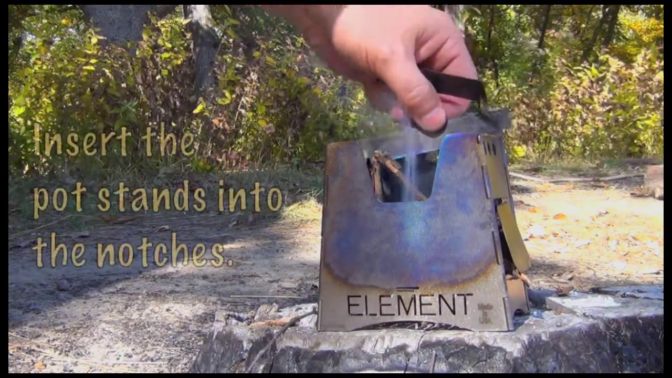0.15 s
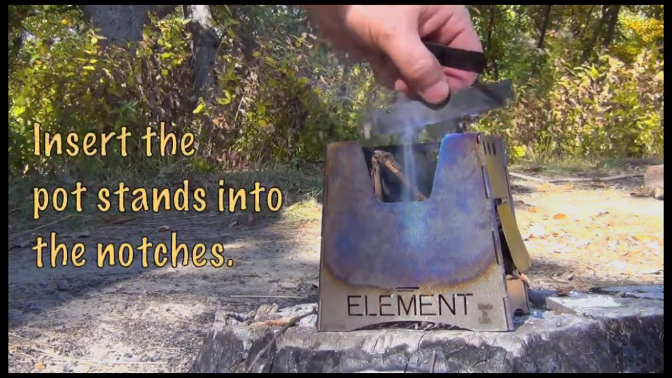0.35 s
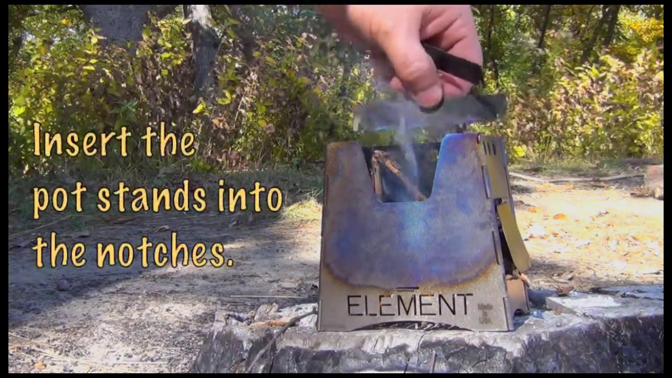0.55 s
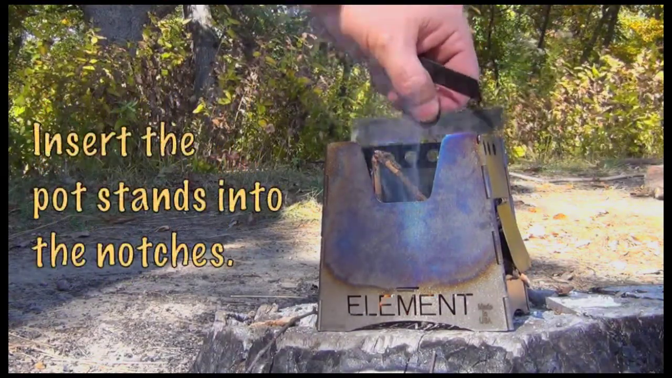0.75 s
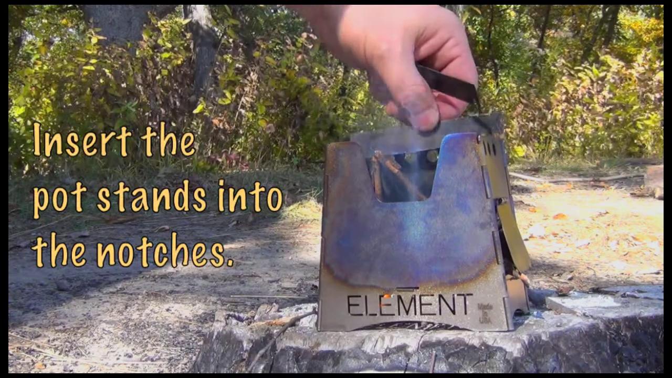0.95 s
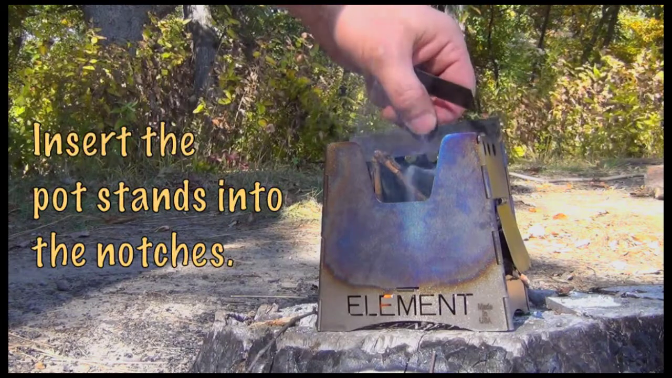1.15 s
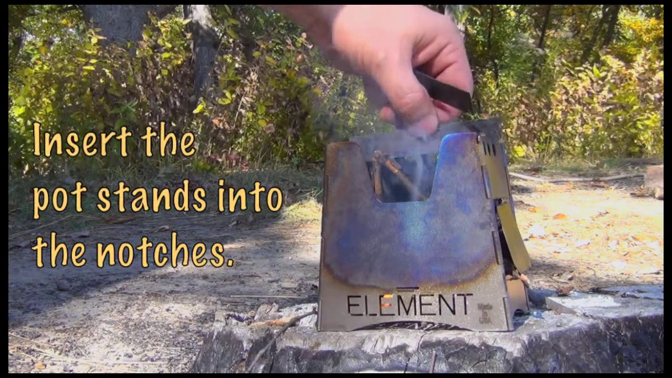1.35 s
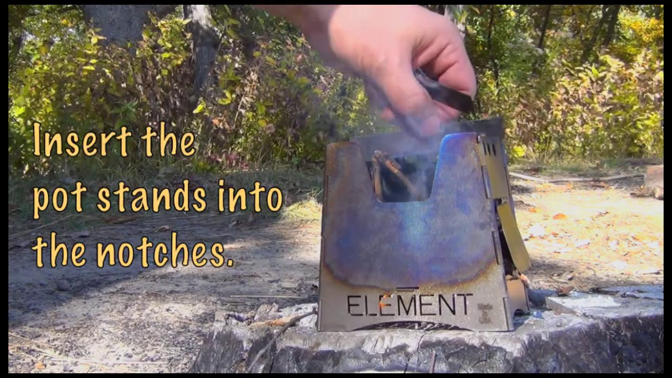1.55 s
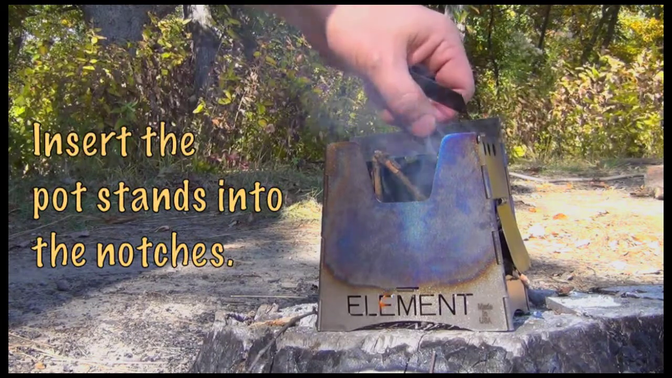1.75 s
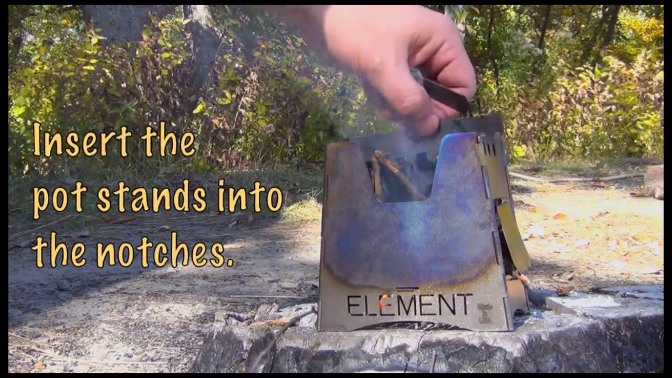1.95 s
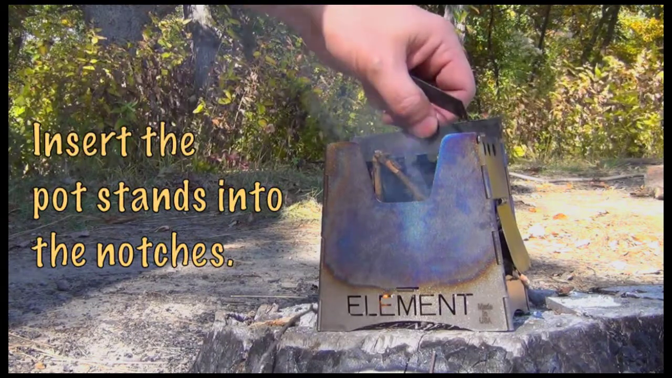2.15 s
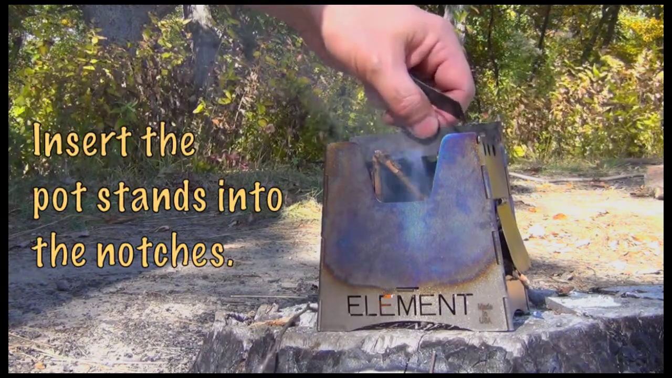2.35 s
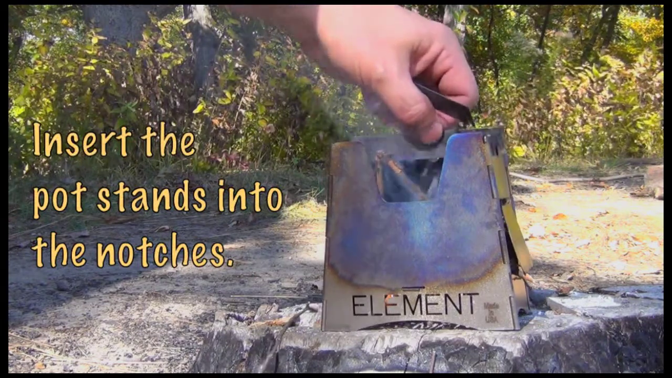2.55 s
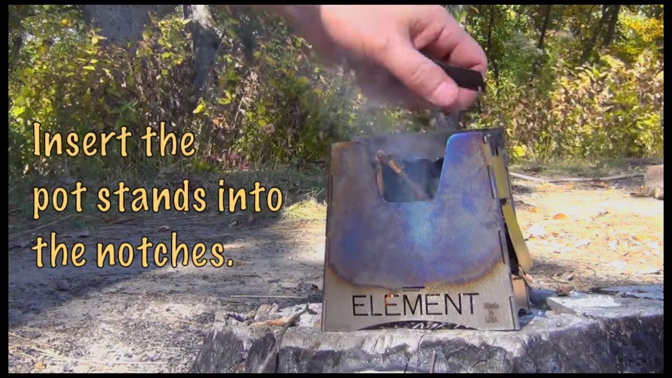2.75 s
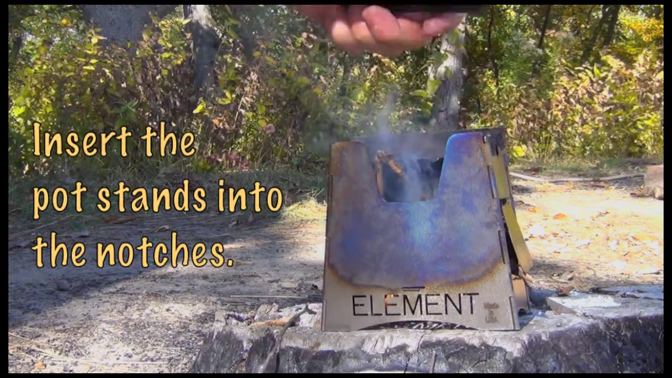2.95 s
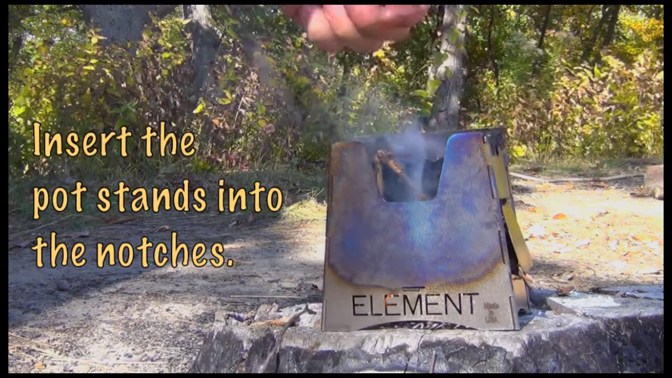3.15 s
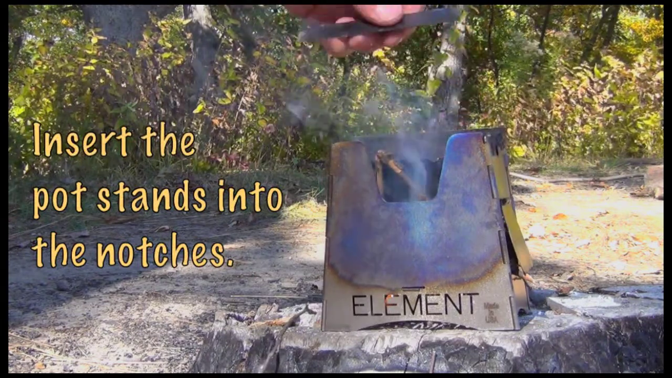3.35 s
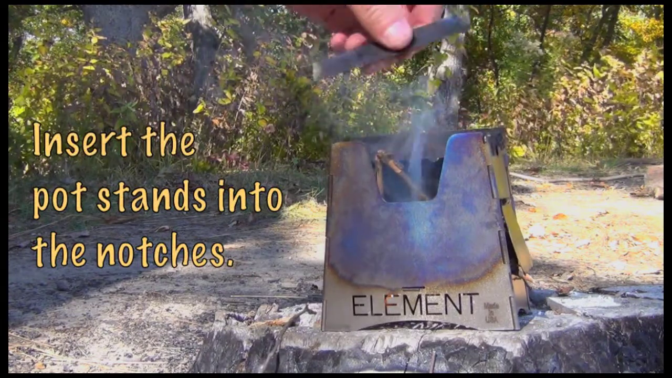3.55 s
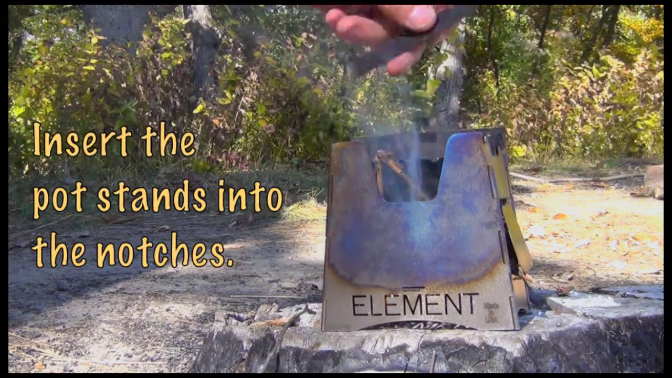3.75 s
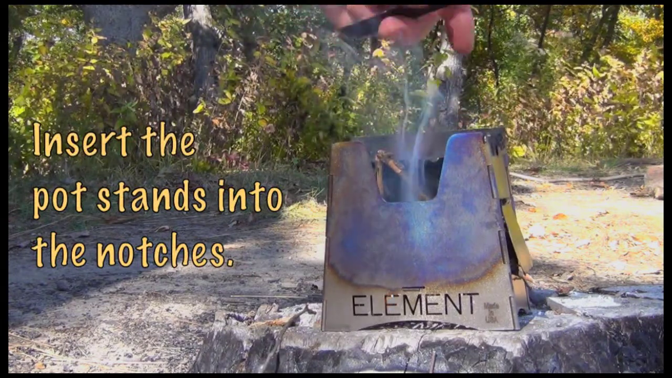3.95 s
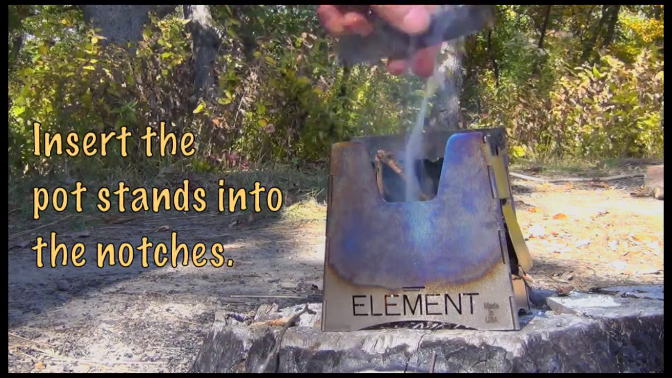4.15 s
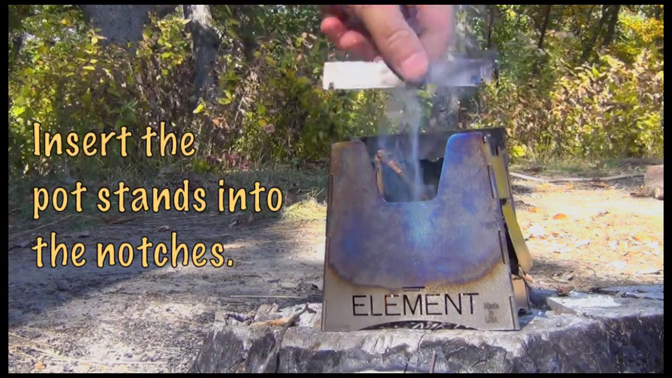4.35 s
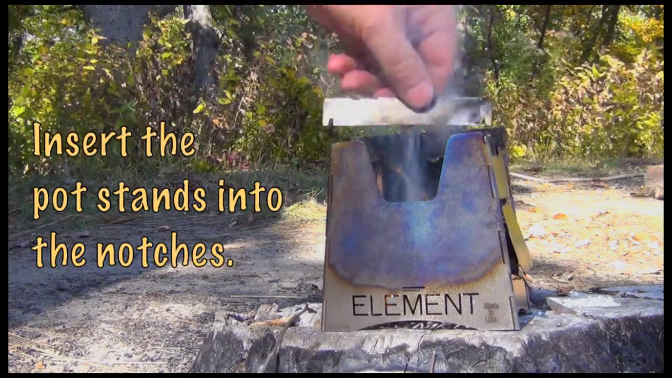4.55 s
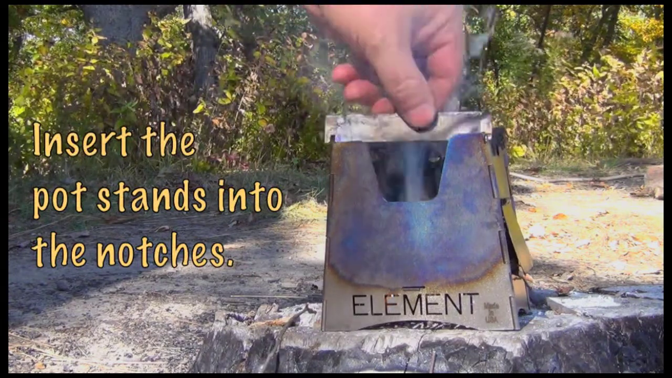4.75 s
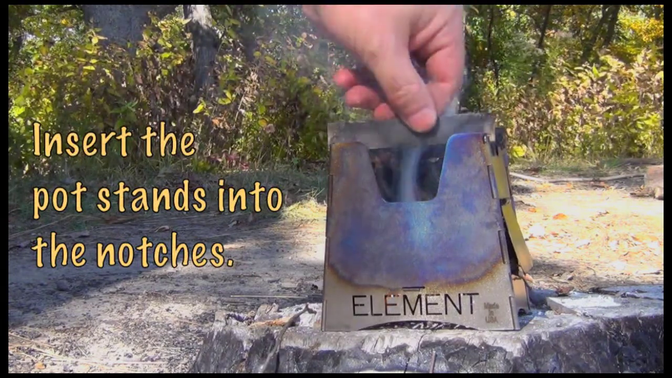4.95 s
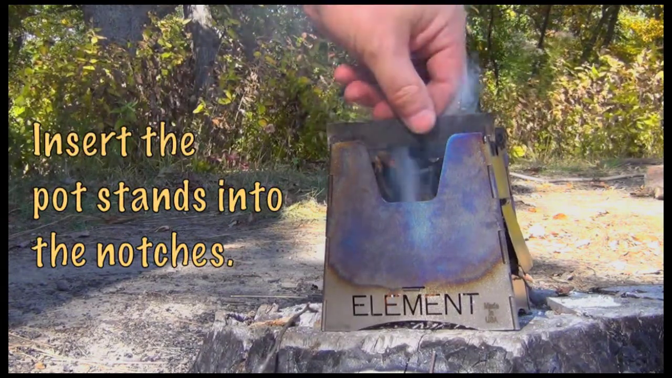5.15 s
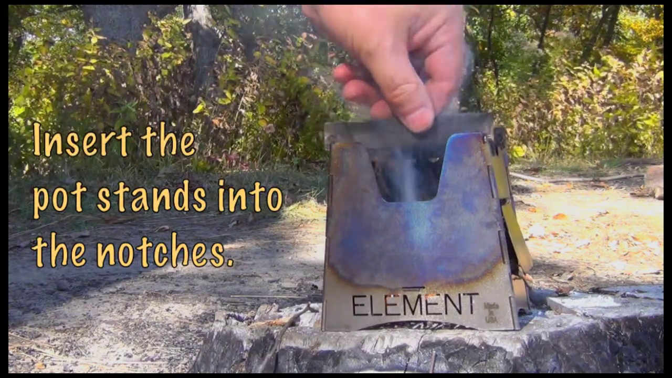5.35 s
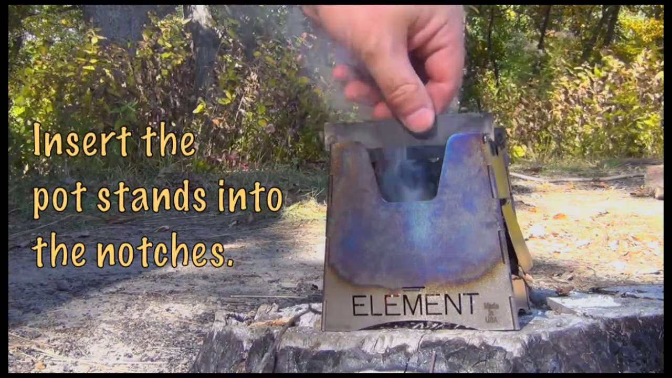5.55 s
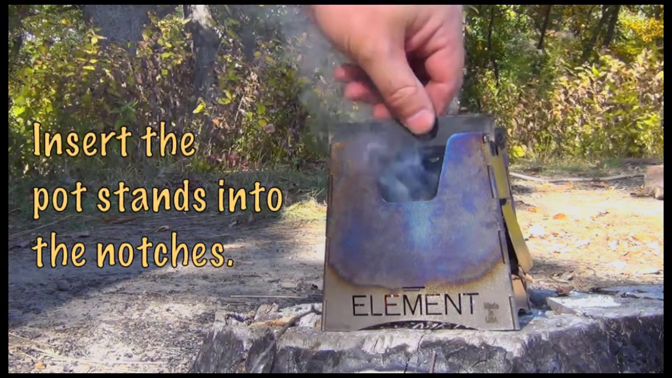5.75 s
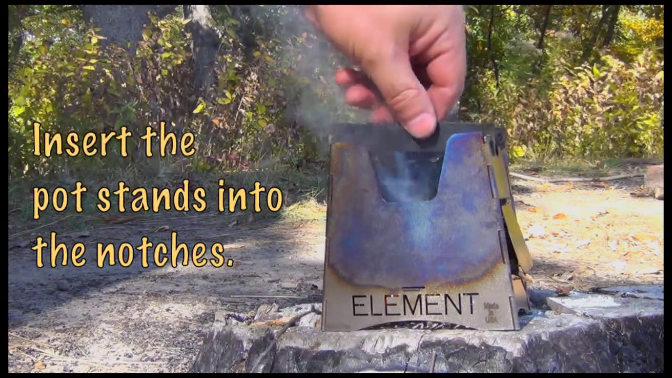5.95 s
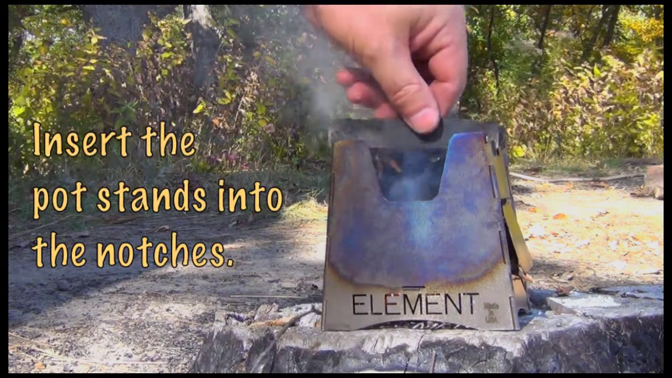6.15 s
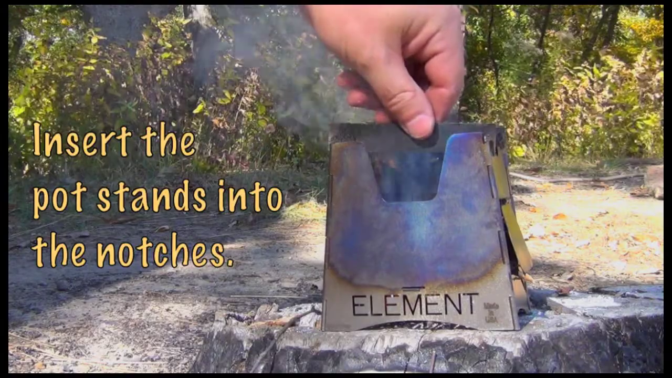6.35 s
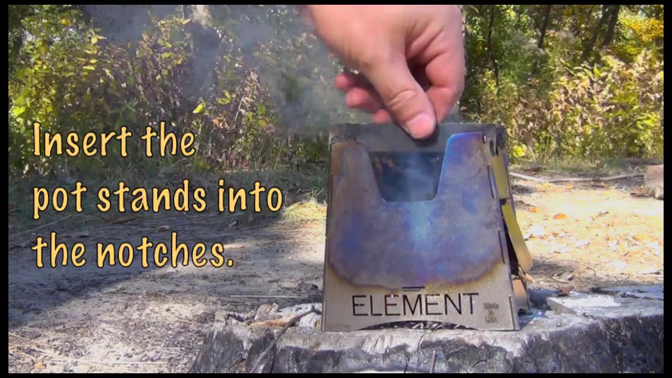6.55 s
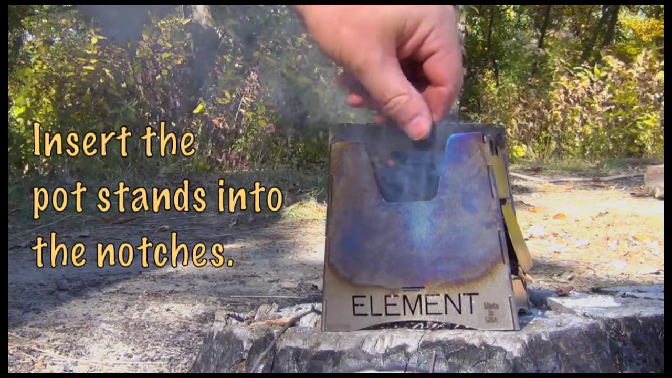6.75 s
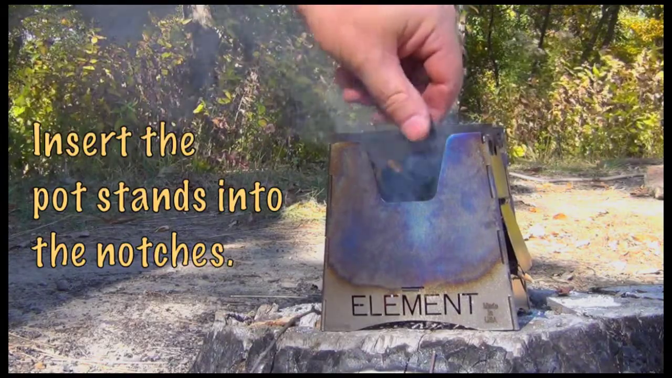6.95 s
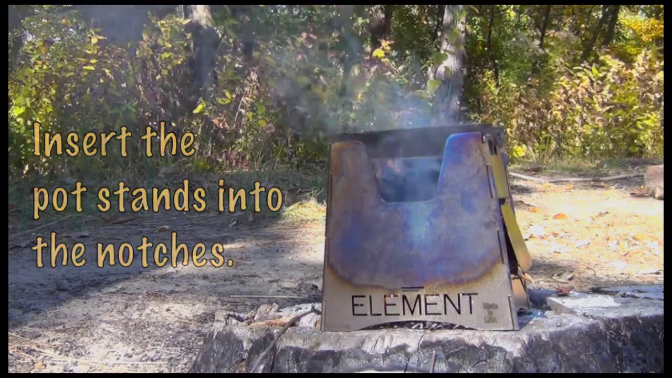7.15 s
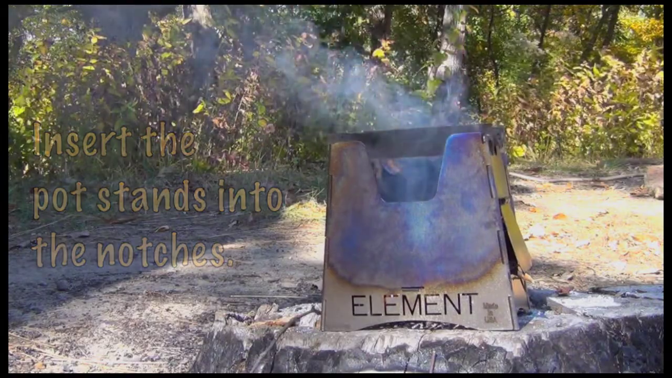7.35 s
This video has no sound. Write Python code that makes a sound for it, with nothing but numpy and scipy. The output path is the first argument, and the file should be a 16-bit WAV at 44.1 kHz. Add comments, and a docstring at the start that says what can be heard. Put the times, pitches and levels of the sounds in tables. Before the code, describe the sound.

Light, dry metallic clatter comes in two busy spells with a quiet gap between, then a faint high ring, above constant recorder hiss and motor whir.

```python
"""A tape camera's whir and hiss run steadily close to its microphone; almost at once thin metal starts to clink.
Pot stands are worked into the notches of a small sheet-metal camp stove, outdoors with no echo.
Edges tick, chatter and scrape: noise bursts and slip trains drive random sheet modes and three registers.
Fingers hold back a bank of high stand modes, which ring out most near the end as the last stand is let go.
Skin whispers on the metal between moves; hiss, motor, tape drum and faint whistles make up the camera."""
import sys
import numpy as np
from scipy import signal
from scipy.fft import rfft, irfft, next_fast_len
from scipy.io import wavfile
from scipy.ndimage import map_coordinates

SR = 44100
rng = np.random.default_rng(int(sys.argv[2]) if len(sys.argv) > 2 else 0)


def to_wav(s):
    """Save 16-bit WAV."""
    ch = np.atleast_2d(s).T  # columns
    pcm = np.round(np.clip(ch, -1, 1) * 32767)  # PCM
    wavfile.write(sys.argv[1], SR, pcm.astype(np.int16))


N = 327222  # length in samples

# steady bed of air and camera hiss, relative spectrum: frequency_hz, density_db_per_hz
HISS_SPECTRUM = [(20, -25), (60, -4), (130, 1), (300, 1), (450, 0), (700, 2), (1200, -1), (1800, 2),
                 (2200, -4), (4500, -5), (7500, -8), (9200, -7.5), (9700, -9.5), (11100, -9.5),
                 (12000, -15.5), (16000, -12.5)]
# tape motor's whir coloured by the camera shell, relative spectrum: frequency_hz, density_db_per_hz
MOTOR_SPECTRUM = [(500, -70), (710, -30.5), (790, -10.5), (860, -3.5), (905, 0.5), (945, -2), (1010, -21),
                  (1110, -9.5), (1240, -17.5), (1340, -22), (1440, -15), (1550, -27.5), (2200, -59)]
# resonances the head drum rings once a turn: centre_hz, width_hz, relative_level_db
DRUM_RESONANCES = [(1423, 69, -9), (2546, 117, 4), (2842, 104, 1.5), (4510, 120, -5)]
# faint whistles of the camera's electronics: frequency_hz, level_db_rms
ELECTRONIC_WHISTLES = [(8820, -81), (15734, -116)]
# stereo likeness of the camera sounds: frequency_hz, likeness (1 = identical channels)
STEREO_LIKENESS = [(40, 0.85), (130, 0.87), (400, 0.91), (900, 0.98), (1800, 1), (2200, 1), (6500, 1),
                   (7800, 0.87), (9500, .998)]
# stereo lean of the camera sounds: frequency_hz, left_minus_right_db
STEREO_LEAN = [(120, -3.5), (250, -0.5), (400, -2), (640, 3), (780, -3), (980, -2.5), (1150, 1.5),
               (1400, -0.5), (1800, -3.5), (2100, 0)]

# an edge strikes the stove: start_s, mid_db (nominal), treble_db (re mid), knock_db (re mid), spot_hz
EDGE_STRIKES = [(0.0505, -51, -0.5, 3, 1240), (0.1887, -46.5, 5, -0.5, 2670), (0.203, -46, 10.5, 3, 2530),
                (0.314, -35.5, -13, -7, 2640), (0.3268, -31, -2.5, -15, 2520),
                (0.5651, -47, 5.5, -10, 7000), (0.8755, -44, 1, -2.5, 1360), (1.1133, -41, 3, -16, 5700),
                (1.1203, -34, -6, -8, 5800), (1.4615, -48, 7.5, -6, 7110), (1.5216, -34.5, -1, -10, 2270),
                (1.541, -41, 2.5, -7, 2590), (1.5885, -25, 2.5, -15, 580), (1.6117, -42.5, -6, -2, 620),
                (1.774, -38, -4, -17, 3100), (1.782, -34.5, -5.5, -10, 603),
                (1.8097, -31.5, 3.5, -25, 1900), (1.8217, -38, 9.5, -3, 1900),
                (1.9504, -33.5, -0.5, -8, 2230), (1.9729, -33, 8, -13, 1350), (1.983, -35.5, -4, -13, 1290),
                (2.067, -34.5, -8, -12, 2600), (2.1555, -34, 1, -8, 1900), (2.347, -29, 2.5, -14.5, 5940),
                (2.4314, -32.5, 4, -9, 5250), (2.5321, -35.5, 2.5, -1, 260), (2.542, -44, -9, 4, 1380),
                (2.6125, -46.5, -10, 5, 3300), (2.658, -43, -10, -11, 3100), (2.708, -44.5, -6, -2, 2310),
                (4.1207, -48.5, 3, -7.5, 2230), (4.6764, -39.5, -4.5, -8.5, 2630),
                (4.7382, -37, -2.5, -13, 6900), (4.836, -36.5, 0, -3.5, 176), (4.9798, -33.5, -5, -6, 5840),
                (4.986, -36, 5.5, -18, 2310), (5.0211, -46.5, -5, 4, 1300), (5.24, -41.5, -4, -7, 3100),
                (5.3667, -35.5, -12, -8.5, 3950), (5.4737, -31.5, -6, -8.5, 3100),
                (5.7253, -35.5, 2, -8, 5740), (5.7325, -28, 6, -12.5, 5900), (6.122, -40.5, 1, -2.5, 1810),
                (6.1738, -38, -1.5, -10, 2980), (6.255, -41.5, -7, -4.5, 3080), (6.27, -36, -1, -6.5, 1330),
                (6.3018, -39, 6.5, -2.5, 640), (6.4577, -45, -1.5, -5.5, 3630), (6.5743, -53.5, 1, 0, 560),
                (6.799, -44.5, -11, -4.5, 3140), (6.8283, -37, -0.5, -5, 3200), (6.8573, -26.5, 0, -7, 240),
                (6.962, -47, 1, 3, 247), (7.0011, -41.5, 9, -13, 3800), (7.015, -40.5, -1, -11, 3970)]
# ring time by hardness; light touches ring longest, the hardest presses the sheets into a dry click:
# hardness_db, t60_s
RING_TIME_BY_HARDNESS = [(-55, 0.11), (-36.5, 0.084), (-24, 0.049), (-23.5, 0.011)]
# how far the touched spot lifts its own resonance before levelling: spot_hz, lift_db
TOUCHED_SPOT_LIFT = [(200, 12.5), (600, 6), (1250, 10), (1800, 10.5), (2600, 8), (3100, 7.5), (3800, 6),
                     (6000, 6), (12000, 3)]
# stove register, the whole box knocking, relative spectrum: frequency_hz, density_db_per_hz
BOX_SPECTRUM = [(50, -47), (110, -31), (175, -10.5), (380, -11), (490, -2), (650, 3), (730, -3.5),
                (1250, 6), (1520, -1), (1790, 3.5), (2050, -16), (2600, -20), (3500, -70)]
# stove register, the flexing walls, relative spectrum: frequency_hz, density_db_per_hz
WALL_SPECTRUM = [(1000, -84), (1800, -15.5), (2380, -12.5), (2700, 1.5), (3030, -0.5), (3300, -5.5),
                 (4700, -9), (5700, -6), (6550, -7), (7000, -13.5), (7900, -16), (9500, -53)]
# the clatter's top register as heard, peaked near 10 kHz by the camera's microphone, relative spectrum:
# frequency_hz, density_db_per_hz
TOP_SPECTRUM = [(5000, -84), (7000, -28), (8200, -16), (8800, -8.5), (9300, -11.5), (9680, 2), (10000, 0),
                (10220, -3.5), (10450, -3.5), (11100, -5), (12300, -14), (14000, -18), (16000, -19.5)]

# a stand slides along its notch: start_s, end_s, mid_db (nominal), treble_db (re mid), spot_hz
NOTCH_SLIDES = [(0.06, 0.133, -45.5, -5, 1080), (0.162, 0.245, -47.5, -5, 2460),
                (0.322, 0.379, -45, 5, 5950), (0.885, 0.914, -50.5, -1, 3030),
                (0.923, 0.995, -47, -0.5, 3300), (1.315, 1.351, -46.5, 0, 6170),
                (1.485, 1.57, -43.5, -9, 3000), (1.733, 1.747, -56, 0, 1230), (1.772, 1.856, -41, -7, 6300),
                (1.962, 2.014, -43.5, -4, 1340), (2.053, 2.081, -38, -12, 2880),
                (2.321, 2.35, -48.5, -5, 6680), (2.459, 2.513, -46, -2, 5530),
                (2.692, 2.789, -55, -4.5, 2310), (4.716, 4.731, -48.5, 2, 3030),
                (4.91, 4.924, -50.5, -3, 2950), (4.9376, 5.013, -45, -3, 1620),
                (5.075, 5.096, -47.5, -3, 3050), (5.354, 5.383, -42, 3.5, 3830),
                (5.714, 5.737, -45.5, -4, 5660), (5.748, 5.784, -39, 2, 5960),
                (5.829, 5.936, -52, -1.5, 5800), (5.963, 5.983, -49, -6.5, 2650),
                (6.0447, 6.061, -45, -6, 3870), (6.095, 6.136, -43.5, -5, 1730),
                (6.139, 6.183, -49.5, -7, 3140), (6.282, 6.374, -48.5, -7, 1480),
                (6.635, 6.653, -54, -5, 3050), (6.816, 6.837, -44, -6, 3200),
                (6.932, 6.952, -51.5, 3, 6080), (6.96, 7.023, -46.5, 2.5, 3800)]
# free ringing of a pot stand: frequency_hz, relative_level_db, t60_s
STAND_MODES = [(2945, -28, .5), (3779, -14, .14), (4538, -15, .14), (5771, -17, .2), (6212, -19, .2),
               (8899, -14, .25), (9485, -7, .33), (9685, -2, .15), (10250, -2, .15), (10320, -4, .15),
               (11090, -6, .22), (11750, -11, .14), (12770, -15, .2), (13200, -9, .13), (14360, -12, .16)]
# moments when the grip on a stand loosens: centre_s, ring_gain_db
GRIP_LOOSENINGS = [(0.36, 4), (1.35, 9), (4.2, 6), (6.36, 15), (7.005, 21.5)]
# fingers shift their hold on a stand; the last row is a faint high ticking after the stand is let go: start_s,
# end_s, treble_db (nominal)
FINGER_RUBS = [(1.041, 1.098, -56.5), (2.912, 3.052, -67), (3.14, 3.29, -58.5), (3.695, 3.784, -63.5),
               (3.953, 3.997, -55.5), (4.164, 4.268, -54), (4.29, 4.354, -56.5), (7.126, 7.165, -61.5)]

DRUM_HZ = 29.97  # drum turns per second
TOP_HZ = 15790  # band limit, also the top of the sheet modes
HARDNESS_TREBLE_SHARE = 0.59  # hardness is a blow's mid level plus this share of its treble
# the edge springs back and lands once more, softly
REBOUND_S, REBOUND_SPREAD_OCTAVES, REBOUND_LOSS_DB = 0.04, 0.49, 21.5
# a slide starts with a touch-down; the lower its spot, the more the whole box knocks
TOUCH_DB, SLIDE_KNOCK_DB, KNOCK_PIVOT_HZ, KNOCK_DB_PER_OCTAVE = -4.5, -5.5, 3000, -5
SLIDE_LIFT_SHARE = 0.77  # a sliding edge wanders, so it favours its spot less than a blow does
GRIPPED_DB, LOOSEN_S = -28, 0.072  # held-back ring feed, and time scale of each loosening
RUB_TREBLE_DB, RUB_KNOCK_DB, RUB_HZ = 10.5, -4, 12200  # skin stirs mostly the top register


def amp(db):
    """Turn decibels into gain."""
    return 10 ** (np.asarray(db) / 20)


def unit(x):
    """Scale to rms 1."""
    return x / np.sqrt(np.mean(x ** 2) + 1e-20)


def along(points, hz):
    """Read a table of frequencies and values along a log frequency axis."""
    table_hz, values = np.transpose(points)
    return np.interp(np.log(hz + 1), np.log(table_hz + 1), values)


def filtered(x, response):
    """Filter by multiplying the spectrum with a response given as a function of frequency."""
    size = next_fast_len(N + SR // 4)
    spectrum = rfft(x, size) * response(np.fft.rfftfreq(size, 1 / SR))
    return irfft(spectrum, size)[..., :N]


def resonances(table, hz):
    """Steep-sided peaks: each resonance acts twice."""
    total = 0
    for centre, width, db in table:
        peak = 1j * hz * width / (centre * centre - hz * hz + 1j * hz * width)
        total = total + amp(db) * peak ** 2
    return total


def add(track, s, sound):
    """Mix a sound into a track at time s."""
    part = track[max(round(s * SR), 0):][:len(sound)]
    part += sound[:len(part)]


def placed(source, response):
    """Colour two signals, mix them to a set likeness and lean each band left or right, at rms 1."""
    def mid_side_response(hz):
        turn = np.arccos(np.clip(along(STEREO_LIKENESS, hz), -1, 1)) / 2
        return response(hz) * np.array([np.cos(turn), np.sin(turn)])

    def lean_response(hz):
        return amp(np.outer([.5, -.5], along(STEREO_LEAN, hz)))

    mid, side = filtered(source, mid_side_response)
    return unit(filtered(np.array([mid + side, mid - side]), lean_response))


def camera(hiss_db=-58, motor_db=-51, drum_db=-67, touch_s=.004, brush_s=0.0082, brush_level=0.63):
    """Broad hiss, the motor's narrow whir, whistles, and a tiny tick whenever the drum's head meets the tape."""
    t = np.arange(N) / SR
    hiss = placed(rng.standard_normal((2, N)), lambda hz: amp(along(HISS_SPECTRUM, hz)))
    motor = placed(rng.standard_normal((2, N)), lambda hz: amp(along(MOTOR_SPECTRUM, hz)))
    # time since the head last touched the tape
    in_turn = (t - touch_s) % (1 / DRUM_HZ)
    ticks = unit(1. * (np.diff(in_turn, prepend=0) < 0))
    # after each tick the head brushes along the tape
    brushing = unit((in_turn < brush_s) * rng.standard_normal((2, N)))
    drum = placed(ticks + brush_level * brushing, lambda hz: resonances(DRUM_RESONANCES, hz))
    whistles = sum(amp(db) * np.sqrt(2) * np.sin(2 * np.pi * hz * t) for hz, db in ELECTRONIC_WHISTLES)
    return amp(hiss_db) * hiss + amp(motor_db) * motor + amp(drum_db) * drum + whistles


def sheet_modes(t, count=420):
    """The crowded modes of thin sheet metal: jittered, evenly spread sines, one row each."""
    hz = (np.arange(count) + rng.random(count)) * TOP_HZ / count
    return np.sin(2 * np.pi * (hz[:, None] * t + rng.random((count, 1))))


def stove(force, mid_db, treble_db, knock_db, spot_hz, spot_db, tilt_db=0, width_hz=80, width_share=0.022):
    """Box, wall and top registers colour a white force causally; the walls tilt by tilt_db an octave."""
    size = 2 * len(force)
    hz = np.fft.rfftfreq(size, 1 / SR)
    # the touched spot drives one resonance harder than the rest
    spot_width_hz = width_hz + width_share * spot_hz
    lift_db = spot_db * np.exp(-((hz - spot_hz) / spot_width_hz) ** 2 / 2)
    walls = along(WALL_SPECTRUM, hz) + tilt_db * np.log2(hz + 1)
    registers = (walls, 0), (along(TOP_SPECTRUM, hz), treble_db), (along(BOX_SPECTRUM, hz), knock_db)
    power = sum((amp(db) * unit(amp(shape + lift_db))) ** 2 for shape, db in registers)
    # folding the cepstrum gives minimum phase, so nothing sounds before the touch
    cepstrum = irfft(np.log(power) / 2)[:len(force)]
    cepstrum[1:] *= 2
    response = np.exp(rfft(cepstrum, size))
    return amp(mid_db) * irfft(rfft(force, size) * response)[:len(force)]


def blow(modes, t, mid_db, treble_db, knock_db, spot_hz, chatter_share=0.51, chatter_db=-2.0,
         ring_db=-2.0, rough_db=3, rise_s=0.00015, stiff_tilt_db=4, neutral_t60=0.099):
    """A blow chatters briefly as rough noise while the walls ring longer with fresh mode strengths."""
    hardness_db = mid_db + HARDNESS_TREBLE_SHARE * treble_db
    t60 = np.interp(hardness_db, *np.transpose(RING_TIME_BY_HARDNESS))
    fall_db = -60 * t / t60
    roughness = amp(rough_db * rng.standard_normal(len(t)))
    grit = unit(rng.standard_normal(len(t)) * roughness)
    chatter = amp(chatter_db + fall_db / chatter_share) * grit
    ring = amp(ring_db + fall_db) * unit(rng.standard_normal(len(modes)) @ modes)
    force = (chatter + ring) * (1 - np.exp(-t / rise_s))
    # a short, stiff blow barely bends the walls, so it sounds brighter
    tilt_db = stiff_tilt_db * np.log2(neutral_t60 / t60)
    spot_db = along(TOUCHED_SPOT_LIFT, spot_hz)
    return stove(force, mid_db, treble_db, knock_db, spot_hz, spot_db, tilt_db)


def contacts(modes, t):
    """An edge strikes, springs back and lands again as a softer copy of the same clink."""
    track = np.zeros(N)
    for s, *stroke in EDGE_STRIKES:
        clink = blow(modes, t, *stroke)
        flight_s = REBOUND_S * 2 ** (REBOUND_SPREAD_OCTAVES * rng.standard_normal())
        add(track, s, clink)
        add(track, s + flight_s, amp(-REBOUND_LOSS_DB) * clink)
    return track


def slide(modes, t, length, mid_db, treble_db, knock_db, spot_hz, slip_rate=950, spread_db=4,
          catch_rate=140, catch_db=3, t60=0.075, direct=0.85, level_db=-2):
    """A sliding edge catches and slips in uneven bursts; every slip ticks and rings the walls."""
    length = max(length, .01)  # seconds
    pressure = np.sqrt(np.abs(np.sin(np.pi * np.minimum(t / length, 1))))
    # burrs along the edge make the strong slips come in clumps
    burrs = map_coordinates(rng.standard_normal(len(t)), [t * catch_rate])
    size_db = catch_db * burrs + spread_db * rng.standard_normal(len(t))
    slips = (rng.random(len(t)) < slip_rate / SR) * amp(size_db) * pressure
    ring = amp(-60 * t / t60) * (rng.standard_normal(len(modes)) @ modes)
    rung = signal.fftconvolve(slips, ring / np.linalg.norm(ring))[:len(t)]
    force = direct * slips + rung
    # even out the energy for the length of the slide
    force *= np.sqrt(length * SR) / (np.linalg.norm(force) + 1e-9)
    spot_db = SLIDE_LIFT_SHARE * along(TOUCHED_SPOT_LIFT, spot_hz)
    return stove(force, mid_db + level_db, treble_db, knock_db, spot_hz, spot_db)


def scrapes(modes, t):
    """The edge touches down with a tick, then slides along its notch."""
    track = np.zeros(N)
    for start, end, mid_db, treble_db, spot_hz in NOTCH_SLIDES:
        knock_db = SLIDE_KNOCK_DB + KNOCK_DB_PER_OCTAVE * np.log2(spot_hz / KNOCK_PIVOT_HZ)
        add(track, start, blow(modes, t, mid_db + TOUCH_DB, treble_db, knock_db, spot_hz))
        add(track, start, slide(modes, t, end - start, mid_db, treble_db, knock_db, spot_hz))
    return track


def stand_ring(clatter):
    """The clatter feeds the stand's decaying high modes, more strongly when it is held loosely."""
    t = np.arange(SR // 2) / SR
    ring = sum(amp(db - 60 * t / t60) * np.sin(2 * np.pi * hz * t) for hz, db, t60 in STAND_MODES)
    now = np.arange(N) / SR
    loosened_db = sum(db * np.exp(-((now - s) / LOOSEN_S) ** 2) for s, db in GRIP_LOOSENINGS)
    drive = clatter * amp(GRIPPED_DB + loosened_db)
    return signal.fftconvolve(drive, ring / np.linalg.norm(ring))[:N]


def rubs(modes, t):
    """Fingertips slide over the thin metal with a faint, high whisper of sparse, damped ticks; the last row,
    after the stand is let go, is a faint high ticking played the same way."""
    track = np.zeros(N)
    for start, end, treble_db in FINGER_RUBS:
        whisper = slide(modes, t, end - start, treble_db - RUB_TREBLE_DB, RUB_TREBLE_DB, RUB_KNOCK_DB,
                        RUB_HZ, slip_rate=400, spread_db=6.5, t60=0.035)
        add(track, start, whisper)
    return track


def slightly_widened(metal, side_db=-28, size=48):
    """A faint, randomly smeared copy, opposite in the two channels, gives the clatter slight stereo width."""
    smear = rng.standard_normal(size)
    side = amp(side_db) * np.convolve(metal, smear / np.linalg.norm(smear))[:N]
    return np.array([metal + side, metal - side])


def scene(size=8192):
    """The stove sounds straight ahead in open air, with no echo, over the camera's own noise."""
    t = np.arange(size) / SR  # time axis of a single blow or slide
    modes = sheet_modes(t)
    clatter = contacts(modes, t) + scrapes(modes, t) + rubs(modes, t)
    metal = clatter + stand_ring(clatter)
    return camera() + slightly_widened(metal)


def record(dry):
    """The camera keeps nothing above its band limit."""
    return filtered(dry, lambda hz: hz < TOP_HZ)


dry = scene()
out = record(dry)
to_wav(out)
```